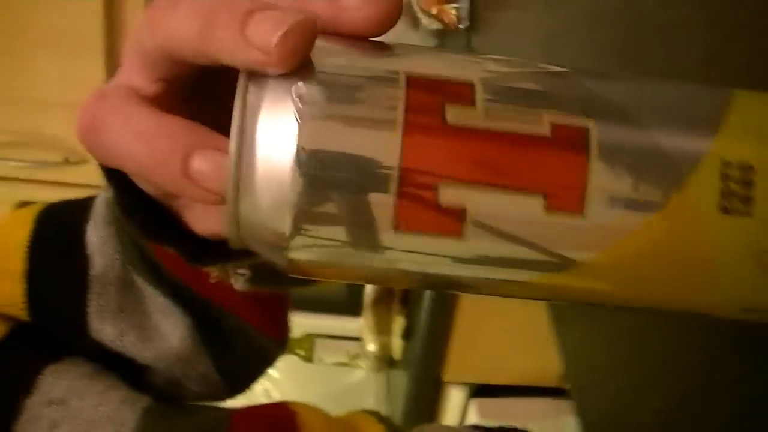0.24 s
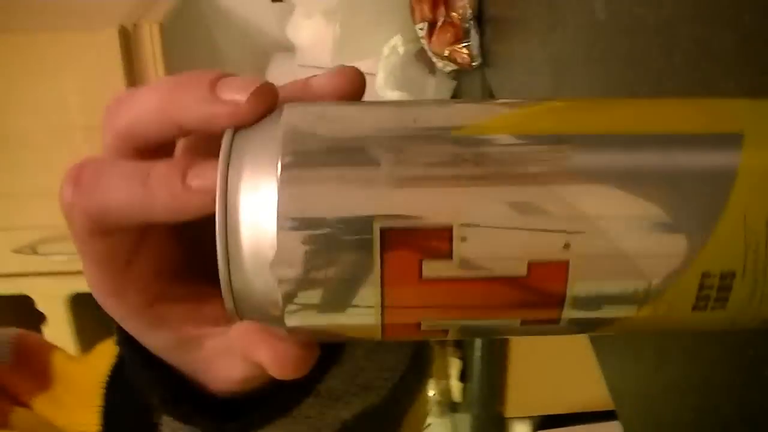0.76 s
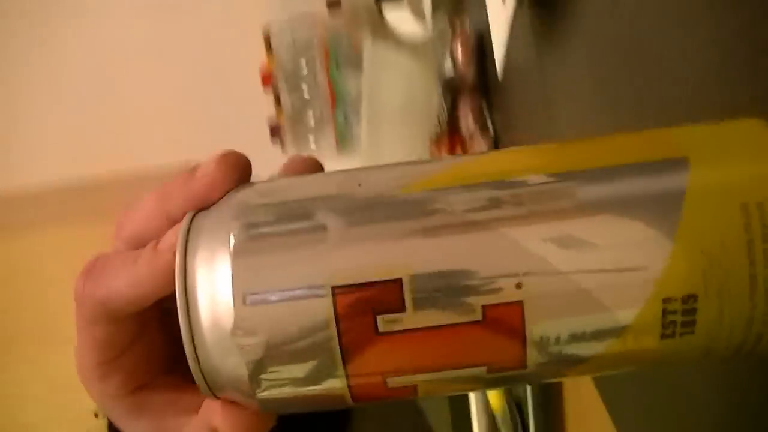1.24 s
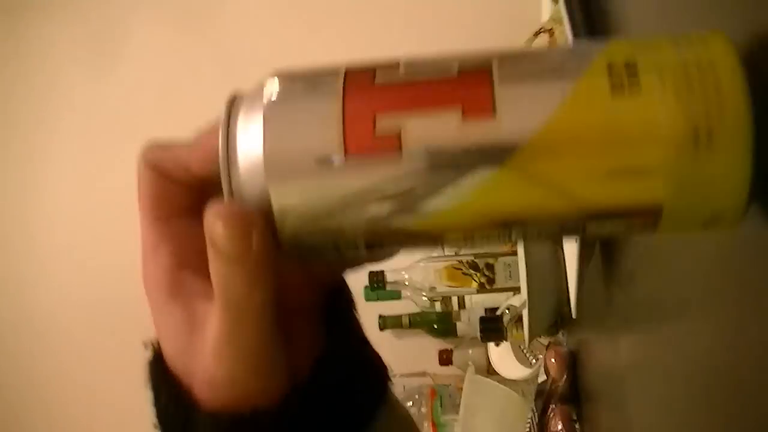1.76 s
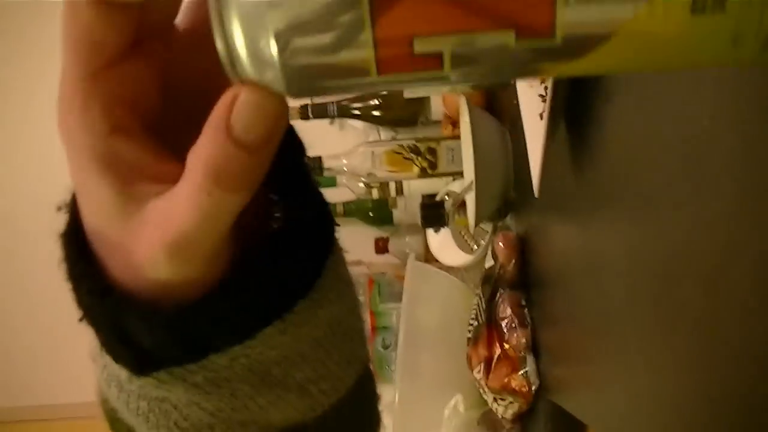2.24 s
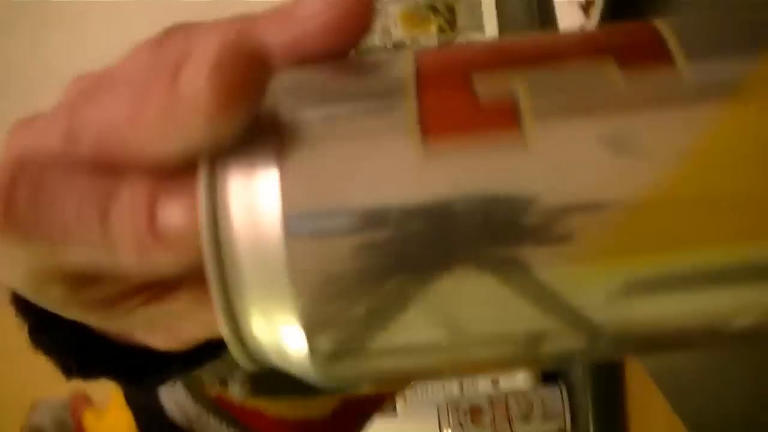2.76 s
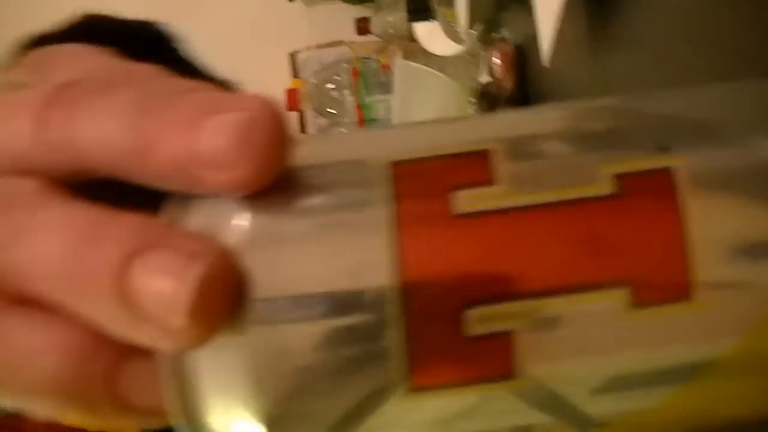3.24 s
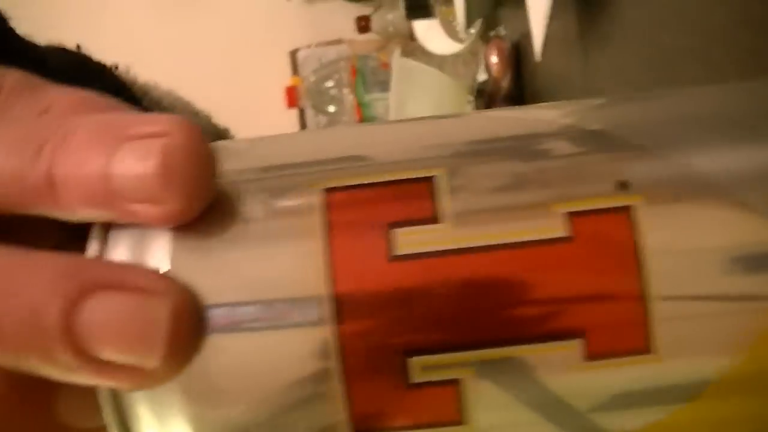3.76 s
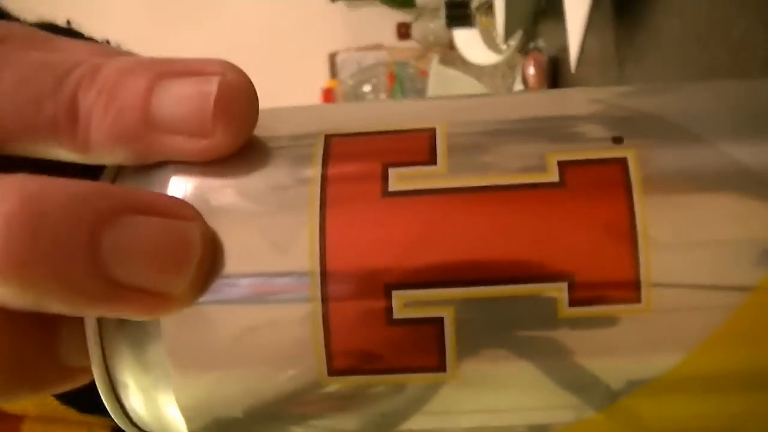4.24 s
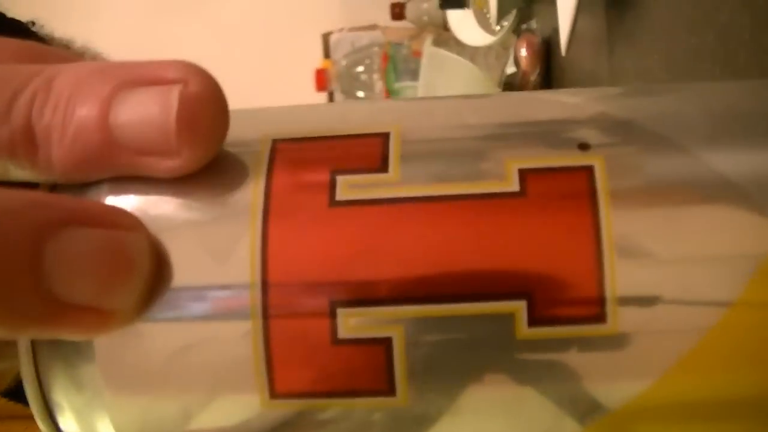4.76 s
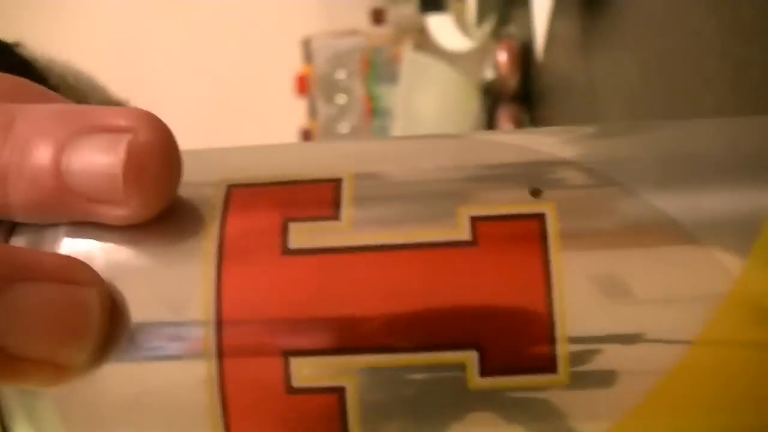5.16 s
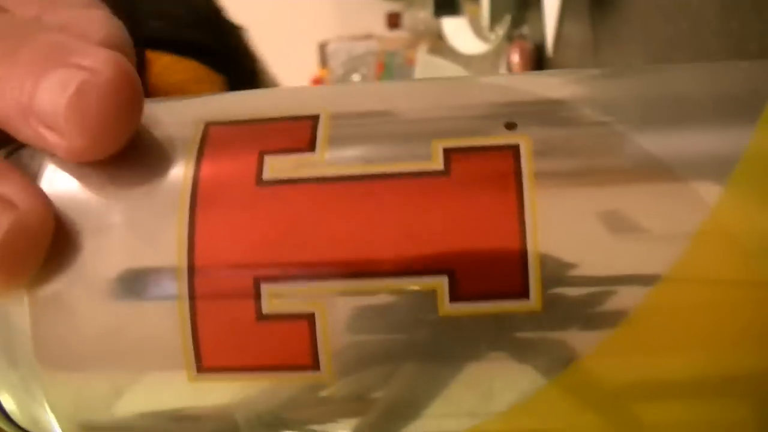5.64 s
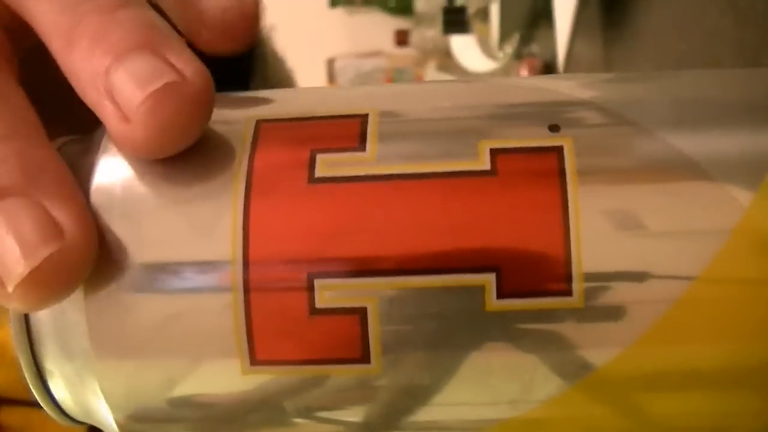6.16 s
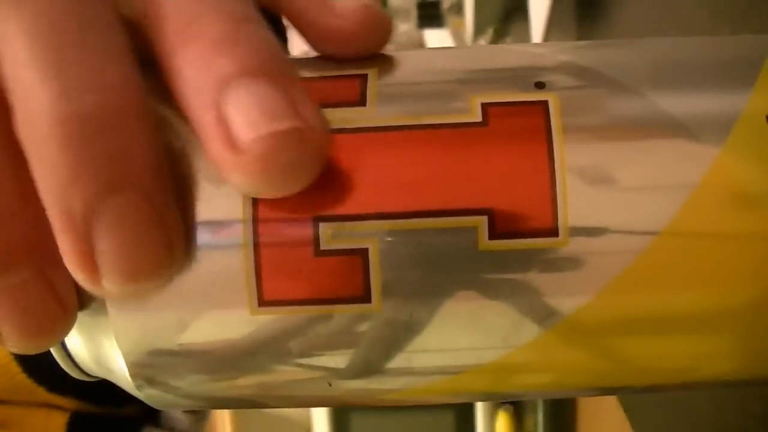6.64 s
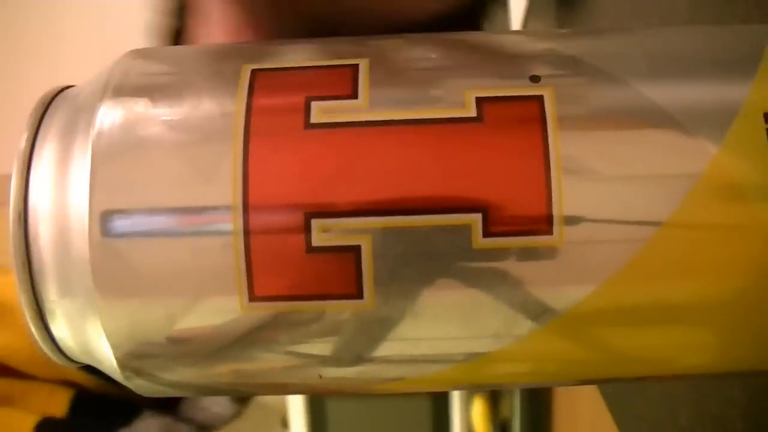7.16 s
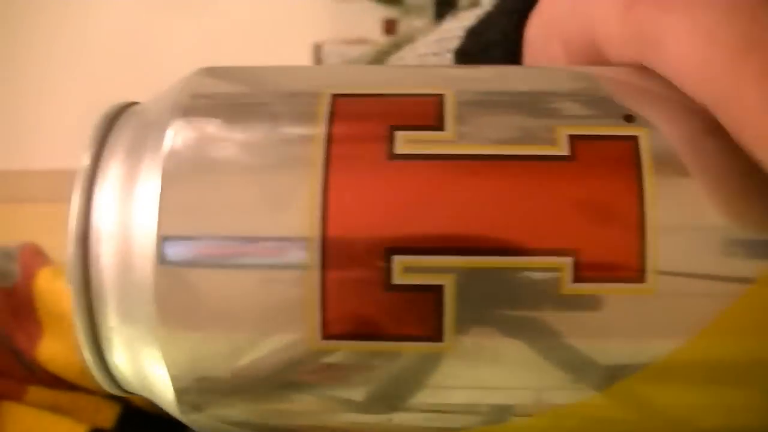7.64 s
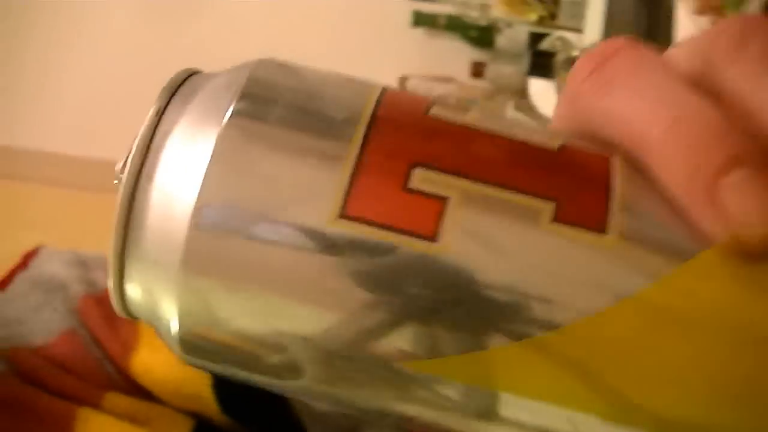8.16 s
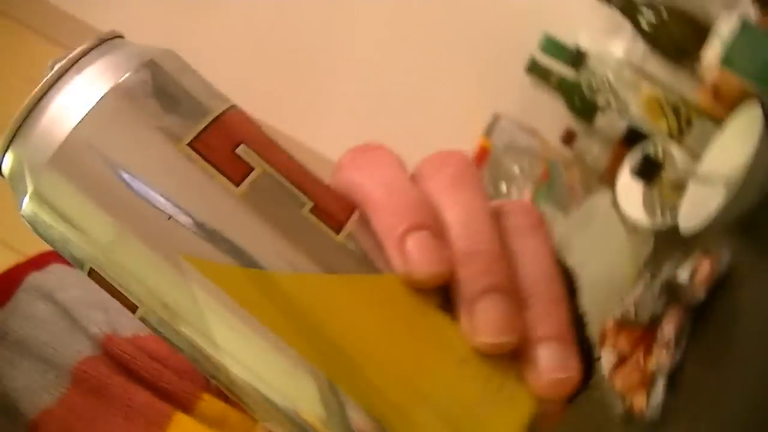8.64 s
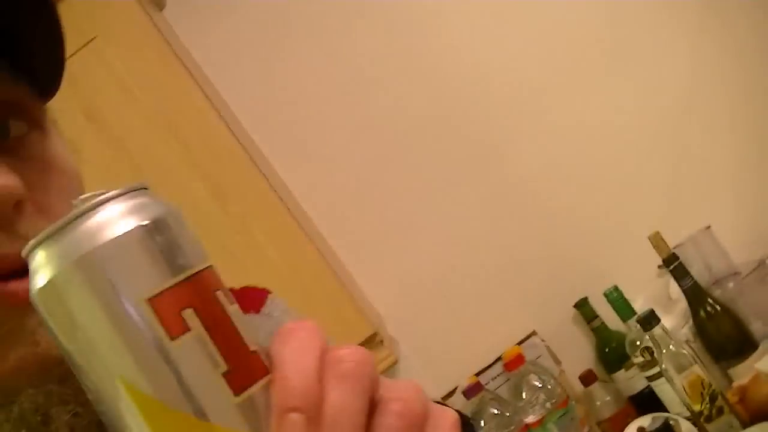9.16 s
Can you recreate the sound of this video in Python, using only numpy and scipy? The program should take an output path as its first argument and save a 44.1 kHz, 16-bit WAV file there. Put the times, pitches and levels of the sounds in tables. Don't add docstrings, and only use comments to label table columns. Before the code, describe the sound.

A small microphone close to a drink can picks up dry scuffs, nail ticks and soft hollow rubbing, with the wall ringing briefly. Things settle, then a violent hissing snap and tearing crack distort the sound as the can opens. A short fizz dies in the hard room; light tab clicks, a small springy rebound and tiny foam pops follow over faint hiss.

```python
import sys
import numpy as np
from scipy import signal
from scipy.fft import rfft, irfft, next_fast_len
from scipy.io import wavfile
from scipy.ndimage import uniform_filter1d

SR = 44100
rng = np.random.default_rng(int(sys.argv[2]) if len(sys.argv) > 2 else 0)


def decibels_to_gain(level_db):
    exponent = np.asarray(level_db, float) / 20
    return 10 ** exponent


def transcribe(u):
    v = np.clip(np.atleast_2d(u).T, -1, 1)
    q = np.round(v * 32767).astype(np.int16)
    wavfile.write(sys.argv[1], SR, q)


N = 414099

SEAL_S, LID_S = 4.8176, 5.0668


def evened(x):
    return x / np.sqrt(np.mean(x ** 2) + 1e-20)


def coloured(x, points):
    size = next_fast_len(len(x))
    point_hz, point_db = np.transpose(points)
    hz = np.fft.rfftfreq(size, 1 / SR)
    gain = decibels_to_gain(np.interp(np.log(hz + 1), np.log(point_hz + 1), point_db))
    return irfft(rfft(x, size) * gain, size)[:len(x)]


def add(mix, start_s, sound):
    part = mix[round(start_s * SR):][:len(sound)]
    part += sound[:len(part)]


def ring(x, hz, t60_s):
    r = np.exp(-np.log(1000) / (max(t60_s, .002) * SR))
    w = 2 * np.pi * hz / SR
    return signal.lfilter([0, np.sin(w)], [1, -2 * r * np.cos(w), r * r], x)


def slips(per_s, spread_db, size=N):
    where, big, sign = rng.random((3, size))
    big = decibels_to_gain(-spread_db * np.log(big + .01))
    return (where < per_s / SR) * big * np.sign(sign - .5)


def swell(t, peak_s, db, rise_s, fall_s):
    rising = (peak_s - t) / np.maximum(rise_s, 1e-4)
    falling = (t - peak_s) / np.maximum(fall_s, 1e-4)
    return decibels_to_gain(db - 20 * np.maximum(rising, falling))


def burst(noise, t60_s, rise_s=0.0005):
    t = np.arange(len(noise)) / SR
    start = np.minimum(t / rise_s, 1) * (t < t[-1] / 2)
    z = rfft(noise * start * decibels_to_gain(-60 * t / max(t60_s, .002)))
    lumps = uniform_filter1d(abs(z), size=len(noise) // 128)
    return irfft(z / lumps) * start


def cracks(rows):
    out, hz = np.zeros(N), np.fft.rfftfreq(8192, 1 / SR)
    for start_s, peak_db, centre_hz, octaves, t60_s, *_ in rows:
        away = np.log2((hz + 20) / centre_hz) / max(octaves, .1)
        colour = 1 / (1 + away ** 4) + 1.3 / (1 + (10.0 * away) ** 2)
        crack = irfft(rfft(burst(rng.standard_normal(8192), t60_s)) * colour)[:4096]
        crack[:16] *= np.arange(16) / 16
        crack[2048:] *= np.hanning(4096)[2048:]
        add(out, start_s, decibels_to_gain(peak_db) * crack / abs(crack).max())
    return out


def tear(start_s, db, t60_s, snaps_per_s, tone):
    t = np.arange(32768) / SR
    out = np.zeros(N)
    snaps = evened(coloured(slips(snaps_per_s, 1.7, size=32768), tone))
    add(out, start_s, snaps * decibels_to_gain(db - 60 * t / t60_s))
    return out


def strokes(rows, rustle_db):
    t = np.arange(0, N, 32) / SR
    peak_s, db, rise_s, fall_s, dry_db = np.transpose(rows)[:, :, None]
    power = swell(t, peak_s, db, rise_s, fall_s) ** 2
    shares = decibels_to_gain([-.6 * dry_db, 0 * dry_db, 1.4 * dry_db + rustle_db]) ** 2
    return [np.interp(np.arange(N) / SR, t, np.sqrt(line)) for line in (shares * power).sum(axis=1)]


def can_wall(knocks, rubbing, modes, split_hz=800):
    # hz, db_per_hz
    skin_tone = [(88, -48.5), (150, -24), (275, -10), (309, 3.5), (534, 1.5), (700, 2.5), (1060, 2.5),
                 (7770, -31), (16000, -45.5)]
    damping_db = 2.8
    deep, upper, rustle = rubbing
    start_s, peak_db, centre_hz, octaves, _, ring_db = np.transpose(knocks)
    spot = rng.standard_normal((len(start_s), len(modes)))
    drive, struck, low, high = slips(1500, 2.6), 0, 0, 0
    knots = np.arange(0, N + 3000, 3000)
    for (hz, db, t60_s), chance in zip(modes, spot.T):
        near_db = -4.0 * abs(np.log2(hz / centre_hz)) / np.maximum(octaves, .2)
        blows = np.zeros(N)
        blows[np.round(start_s * SR).astype(int)] = decibels_to_gain(peak_db + ring_db + db + near_db + 1.9 * chance)
        struck = struck + ring(blows, hz, t60_s)
        free = np.interp(np.arange(N), knots, rng.standard_normal(len(knots)))
        hum = decibels_to_gain(db + damping_db * free) * evened(ring(drive, hz, .5 * t60_s))
        if hz < split_hz:
            low = low + hum
        else:
            high = high + hum
    skin = evened(coloured(slips(4000, 0.83), skin_tone))
    bright = evened(coloured(skin, [(2500, -28.5), (4500, 1.0), (16000, 0)]))
    rubbed = deep * evened(low) + upper * (.6 * evened(high) + 0.55 * skin) + 0.51 * rustle * bright
    return cracks(knocks) + struck + rubbed


def air():
    # hz, db_per_hz
    air_tone = [(25, -24), (60, -21), (120, -12), (250, -8), (500, -6.5), (800, -6), (1200, -2.5),
                (1600, -4.5), (2200, -10.5), (4000, -16.5), (8000, -20), (13000, -26.5), (16200, -32)]
    waver = decibels_to_gain(.8 * evened(uniform_filter1d(rng.standard_normal(N), 6000)))
    return decibels_to_gain(-62.5) * evened(waver * coloured(rng.standard_normal(N), air_tone))


def sealed_can():
    # start_s, peak_db, centre_hz, ring_db
    tick_rows = [
        (0.0745, -35, 3520, -33),
        (1.053, -42, 2020, -24),
        (1.95, -22.5, 1950, -14.5),
        (2.578, -12.5, 1940, -21),
    ]
    # start_s, peak_db, centre_hz, t60_s, ring_db
    nail_rows = [
        (0.6666, -14.5, 4680, 0.031, -11.5),
        (0.6665, -26, 2420, 0.016, -12),
        (1.1673, -32, 2090, 0.029, -7),
        (2.6412, -27.5, 4800, 0.031, -20),
    ]
    # start_s, peak_db, octaves, t60_s, ring_db
    thud_rows = [(0.302, -63, 1.3, 0.035, 4), (0.919, -40, 1.1, 0.047, -8.5),
                 (1.9497, -29, 1.7, 0.011, -10.5), (2.517, -49, 1.4, 0.03, -14), (2.571, -38, 2, 0.03, -9),
                 (2.576, -28, 2.3, 0.048, -8), (2.807, -45.5, 2.3, 0.03, -2), (3.039, -39, 1.9, 0.093, -7)]
    # hz, db, t60_s
    sealed_modes = [(281, 5.5, 0.29), (354, -4, 0.11), (420, -12.5, 0.13), (1122, -3.5, 0.18),
                    (1133.3, -8.5, 0.17), (1751, -8, 0.23), (1950, -5, 0.16), (2360, -5, 0.13),
                    (2400, -11.5, .12), (2630, -9.5, 0.177), (3310, -14, 0.15), (4390, -13, 0.12),
                    (4800, -14, 0.15), (5052, -16, .15), (6300, -17, 0.11)]
    # (rise, fall per
    # 20 dB)
    handling = [(.074, -63, .012, .03, 11), (.13, -62, 0.066, .15, 3), (.21, -62, .05, .2, -2),
                (.302, -50, 0.18, 0.11, -4.5), (.364, -49, 0.044, 0.14, 6.5), (.69, -48, .008, 0.073, -3),
                (.782, -49.5, 0.13, 0.12, -2), (.935, -48.5, 0.097, 0.09, 0), (1.058, -49.5, .05, 0.16, 3.5),
                (1.15, -56, 0.12, 0.057, -12), (1.19, -53.5, .02, .15, 6), (1.266, -46, 0.095, 0.072, -0.5),
                (1.382, -52, .12, 0.13, 2.5), (1.47, -54, .08, 0.057, -10), (1.52, -58.5, 0.022, 0.18, -7),
                (1.62, -61.5, 0.091, 0.47, 12.5), (1.802, -52, 0.14, 0.22, 7.5),
                (1.93, -57.5, 0.037, 0.035, 4),
                (1.979, -40, 0.025, 0.12, -0.5), (2.08, -51, .1, 0.5, 2), (2.14, -56, .05, .06, 8),
                 (2.32, -53.5, .03, 0.15, 7), (2.43, -63, 0.14, 0.031, -15), (2.518, -65, .03, .03, 0),
                 (2.556, -54.5, .04, 0.022, 0), (2.6, -36, 0.016, 0.088, 1.5),
                 (2.646, -41, .04, 0.029, 8.5), (2.67, -46, .03, 0.13, 3), (2.824, -47.5, 0.049, 0.2, 4.5),
                 (3.05, -50, 0.035, 0.061, -9), (3.184, -56, 0.092, 0.11, -11.5),
                 (3.271, -61.5, .05, .2, -9), (3.344, -59.5, .15, 0.27, 1), (3.466, -59.5, 0.24, 0.051, -4),
                 (3.57, -72.5, .05, .5, -13), (3.704, -72, .1, .08, -2), (4.0, -72.5, .5, 0.66, -2),
                 (4.504, -55.5, 0.092, 0.048, 2), (4.6, -62.5, .08, 0.046, 2), (4.79, -63, 0.064, .02, -5)]
    ticks = [(s, db, hz, 1, 0.029, ring_db) for s, db, hz, ring_db in tick_rows]
    nail = [(s, db, hz, 0.26, t60_s, ring_db) for s, db, hz, t60_s, ring_db in nail_rows]
    thuds = [(s, db, 287, *rest) for s, db, *rest in thud_rows]
    return can_wall(ticks + nail + thuds, strokes(handling, rustle_db=-12), sealed_modes)


def knock_edges():
    # start_s, peak_db, centre_hz, octaves, t60_s
    edge_rows = [(0.0742, -33, 6400, 0.57, 0.016), (0.6669, -11.5, 5840, 1, 0.015),
                 (1.1662, -31, 6000, 0.9, 0.02), (1.951, -30, 7000, 0.74, 0.037),
                 (2.5757, -13.5, 8400, 0.98, 0.012), (2.578, -23, 6500, .55, .03),
                 (2.6399, -26.5, 4300, 1.4, 0.018), (6.4595, -26, 5190, 0.55, 0.03),
                 (6.46, -26, 2200, .5, .05), (6.9935, -46.5, 5590, 0.3, 0.019)]
    return cracks(edge_rows)


def lone_modes():
    # start_s, hz, height_db, t60_s
    lingering = [(.671, 280, -41, .12), (2.82, 1750, -55, .4), (5.076, 183, -46, 1.1),
                 (5.077, 285, -47, 1.5), (5.078, 318, -53, 1.0), (5.079, 361, -51, 1.2),
                 (6.335, 425, -58, .5), (6.461, 2690, -53, .7), (6.975, 178, -54, 1.0),
                 (6.99, 447, -53, 1.8)]
    ping_rows = [(.0745, 2000, -48.5, .06), (0.0742, 3550, -45, .05), (.45, 6120, -58, .07),
                 (.669, 1954, -35, 0.089), (.668, 5040, -32, .2), (.668, 4560, -25, .07),
                 (1.9415, 1900, -45, 0.033), (1.951, 9200, -39.5, .02), (1.951, 12800, -40, .01),
                 (2.577, 8900, -28, .018), (2.577, 5960, -32, .02), (2.578, 4490, -34, .025),
                 (2.825, 2400, -56, .3), (3.04, 3290, -56, .15), (5.067, 4200, -2.5, .013),
                 (5.07, 1850, -9, .035), (5.075, 2294, -30.5, 0.41), (5.075, 1880, -31, 0.36),
                 (5.074, 820, -13, .055), (6.456, 1110, -45, .03), (6.4598, 2643, -16, .022),
                 (6.4598, 5190, -30, .015), (6.46, 10200, -35, .006), (6.9745, 946, -41, .04),
                 (6.9755, 4800, -50, .03), (6.9935, 1054, -37, .035), (6.9932, 4900, -46, .04),
                 (6.9935, 6300, -47, .03), (7.04, 440, -56, 1.4)]
    out, t = np.zeros(N), np.arange(SR) / SR
    for start_s, hz, db, t60_s in lingering + ping_rows:
        wobble = 1 + .006 * evened(uniform_filter1d(rng.standard_normal(SR), 1500))
        tone = np.sin(2 * np.pi * hz * np.cumsum(wobble) / SR)
        envelope = np.minimum(t * hz / 2, 1) * decibels_to_gain(db - 60 * t / t60_s) * (1 - t)
        add(out, start_s, envelope * tone)
    return out


def kitchen(x):
    # hz, t60_s
    decay = [(150, 0.54), (400, 1), (1000, .7), (2500, 0.74), (5000, 0.55), (9000, 0.57), (15000, 0.15)]
    echoes, at = np.zeros(SR), np.arange(260, SR - 20, 12)
    echoes[at + rng.integers(0, 12, len(at))] = rng.choice([-1., 1.], len(at))
    hz, t, z = signal.stft(echoes, SR, nperseg=256)
    decay_hz, t60_s = np.transpose(decay)
    band_t60_s = np.interp(np.log(hz + 1), np.log(decay_hz), t60_s)[:, None]
    tail = signal.istft(z * decibels_to_gain(-60 * t / band_t60_s), SR, nperseg=256)[1]
    return signal.fftconvolve(x, tail / np.linalg.norm(tail))[:N]


def thumps():
    # start_s, peak_db, centre_hz, octaves, t60_s
    thump_rows = [(0.14, -50, 180, 0.8, 0.15), (0.74, -52, 150, 0.8, 0.07), (1.496, -57, 150, 0.41, 0.12),
                  (1.95, -56, 150, .8, 0.1), (1.1, -68, 130, .6, .08), (2.575, -58, 130, .6, .12),
                  (3.04, -64, 130, .6, .1), (6.975, -59, 130, .6, .12)]
    return cracks(thump_rows)


def close_clicks():
    # start_s, peak_db, centre_hz, octaves, t60_s
    low_rows = [(0.141, -28, 800, 1.6, 0.03), (0.147, -26.5, 714, 1.9, 0.058),
                (.165, -33.5, 1400, 0.98, .06), (.178, -37, 1700, .6, .03), (1.496, -25, 960, 1.3, 0.026),
                (9.078, -40, 630, 0.78, 0.058), (9.29, -45, 1300, 0.4, 0.027)]
    high_rows = [(0.1515, -25.5, 2570, 1.3, 0.0075), (0.1619, -24, 6590, 1.4, 0.0085),
                 (0.1792, -36, 5500, 0.6, 0.0074), (1.4814, -39, 1860, 1.4, 0.05),
                 (1.495, -25, 2220, 1.35, 0.02), (1.5135, -52, 2290, 1.3, 0.01),
                 (1.807, -38, 6000, 1.4, 0.011), (5.4637, -28.5, 3210, 1.23, 0.01),
                 (5.6745, -30, 2420, 1.3, 0.016), (6.78, -25, 2100, .9, 0.0091)]
    bright_rows = [(1.4983, -56, 8030, 0.92, 0.008), (5.4655, -38, 8200, 0.46, 0.0038),
                   (5.6745, -35.5, 9020, 0.9, 0.0098), (6.78, -31.5, 6500, 1, 0.01)]
    # start_s, peak_db, centre_hz
    fizz_rows = [(5.055, -31, 8000), (5.3774, -53, 8720), (5.385, -54, 8600), (5.9804, -51, 9460),
                 (6.0634, -51, 6320), (6.1345, -47.5, 8720), (8.5579, -50.5, 6370), (8.7135, -30.5, 12220),
                 (8.752, -51, 7640), (8.8845, -37, 8100), (8.9034, -46.5, 5080), (8.9145, -45.5, 7500),
                 (8.9478, -49, 7900), (8.877, -47, 7000)]
    fizz = [(*row, 0.71, 0.01) for row in fizz_rows]
    return cracks(high_rows + low_rows + bright_rows + fizz)


def vent():
    # hz, db_per_hz
    jet_tone = [(180, -54), (300, -22.5), (487, -23), (727, -31.5), (965, -18.5), (1370, -22), (1820, -4),
                (2420, -11), (2630, -8), (3610, -3), (5290, -6), (7770, 1), (9030, -9.5), (11600, -4.5),
                (16200, -19.5)]
    # hz, db_per_hz
    gush_tone = [(59, -53.5), (100, -19), (458, -3.5), (989, -6), (1090, -16.5), (1310, -1), (1540, -14),
                 (3660, -6.5), (5000, -8), (6500, -38), (11000, -120)]
    # peak_s, db, rise_s, fall_s
    gush_rows = [
        (4.819, -34.5, 0.0019, .08),
        (4.92, -27.5, .045, 0.16),
    ]
    leak_s, blow_db, blow_s, shut_s = 0.0076, -16, 0.055, .024
    t = np.arange(N) / SR
    down_s = SEAL_S + blow_s
    venting = (t > SEAL_S) & (t < LID_S)
    leak = decibels_to_gain(-36) * (t < SEAL_S) * np.clip((t - SEAL_S + leak_s) / .004, 0, 1)
    spurt = swell(t, SEAL_S, -7, 1, fall_s=0.022)
    blow = np.where(t < down_s, decibels_to_gain(blow_db), swell(t, down_s, blow_db, 1, shut_s))
    trickle = swell(t, down_s + shut_s, -31.5, shut_s, fall_s=0.13)
    seep = decibels_to_gain(-47.5)
    jet = leak + venting * (spurt + blow + trickle + seep)
    gush = venting * sum(swell(t, *row) for row in gush_rows)
    sputter = decibels_to_gain(1.3 * evened(uniform_filter1d(rng.standard_normal(N), 60)))
    hiss = evened(sputter * coloured(rng.standard_normal(N), jet_tone))
    return jet * hiss + gush * evened(coloured(slips(2500, 2.4), gush_tone))


def seal_break():
    # hz, db_per_hz
    seal_tone = [(18, -60.5), (30, -28), (267, -32.5), (895, -19), (1160, -27.5), (1970, -4.5),
                 (2850, -4.5), (3090, -17), (3430, -7.5), (6280, 2), (7550, -1.5), (14200, -16.5),
                 (16200, -29.5)]
    return tear(SEAL_S, db=-1.1, t60_s=0.04, snaps_per_s=6000, tone=seal_tone)


def opened_can():
    # start_s, peak_db, centre_hz, t60_s, ring_db
    grip_rows = [
        (8, -49.5, 376, 0.069, -47),
        (6.974, -34.5, 982, 0.054, -16),
        (7.003, -39.5, 480, 0.17, -20),
        (4.892, -36, 350, .04, -30),
        (7.743, -32.5, 505, 0.053, -31),
        (4.912, -27, 600, .06, -20),
    ]
    # start_s, peak_db, centre_hz, octaves, ring_db
    jolt_rows = [
        (5.076, -36, 260, 0.64, -1),
        (6.977, -45, 600, 0.73, -4),
    ]
    # start_s, peak_db, centre_hz, octaves, ring_db
    tab_rows = [
        (6.459, -26, 2120, 0.83, -14.5),
        (6.4599, -25, 2720, 0.22, -15),
        (6.9762, -36.5, 2520, 0.25, -29.5),
        (6.9825, -35, 2300, 0.53, -30),
        (6.9937, -39, 3000, 0.6, -30),
    ]
    # hz, db, t60_s
    opened_modes = [(175, -8, 0.4), (250, -9, .4), (282, -6, .6), (450.9, -8.5, 0.4), (495, -8.5, 0.13),
                    (686, -10, 0.22), (988, 0, 0.2), (1300, -9, .12), (2200, -9.5, 0.13),
                    (2400, -8.5, 0.13), (2480, -9.5, .16), (2770, -11.5, 0.2), (3650, -14.5, .15),
                    (5217, -17, .07)]
    # (rise, fall per 20 dB)
    lifting = [(5.5, -58, .012, .3, 5), (5.66, -60, 0.051, .02, 3), (5.7, -55, .012, .14, 8),
               (6.086, -66, 0.31, .06, -1), (6.176, -65, .1, 0.085, -1), (6.35, -54, .04, .08, -2),
               (6.37, -55, .07, 0.038, 2), (6.49, -55, .02, .15, 4), (6.44, -56, .1, .02, 1),
               (7.0, -43, 0.013, 0.043, -0.5), (7.03, -61, .03, 0.27, -14), (7.35, -55.5, 0.075, .1, -5),
               (7.626, -57.5, .09, 0.12, 0), (7.76, -54.5, .04, 0.058, -5), (7.848, -70, 0.078, 0.087, -12)]
    grip = [(s, db, hz, 1.17, t60_s, ring_db) for s, db, hz, t60_s, ring_db in grip_rows]
    blows = [(*rest, 0.028, ring_db) for *rest, ring_db in tab_rows + jolt_rows]
    return can_wall(blows + grip, strokes(lifting, rustle_db=-19), opened_modes)


def lid_rip():
    # start_s, peak_db, centre_hz, octaves, t60_s
    rip_rows = [
        (5.0692, 0.5, 4150, .36, 0.045),
        (5.073, -9, 5800, .4, .04),
        (5.0667, -5, 11440, 0.55, 0.05),
        (5.0685, -1.5, 6300, 0.64, 0.044),
        (5.0690, -1.5, 1920, 0.67, 0.037),
        (5.0718, -8.5, 838, 0.44, 0.057),
    ]
    return cracks(rip_rows)


def last_puff():
    # hz, db_per_hz
    puff_tone = [(200, -39), (600, -15.5), (880, -2.5), (1300, -9.5), (1950, -3.5), (2900, -15), (4000, -2),
                 (5500, -11), (8000, -23.5), (16000, -40)]
    return tear(LID_S, db=-24, t60_s=0.64, snaps_per_s=13000, tone=puff_tone)


def scene():
    # hz, db
    side_tone = [(100, -48), (1000, -54), (4000, -66), (8000, -28), (14000, -25)]
    can = sealed_can() + opened_can() + knock_edges() + lone_modes()
    can += vent() + seal_break() + lid_rip()
    close = close_clicks() + last_puff()
    near = can + close + kitchen(decibels_to_gain(-12.5) * can + decibels_to_gain(-17) * close)
    near = signal.sosfilt(signal.butter(3, 240, "high", fs=SR, output="sos"), near)
    mid = near + thumps() + air()
    side = coloured(mid * np.sign(rng.standard_normal(N)), side_tone)
    return np.array([mid + side, mid - side])


def top_cut(x):
    return signal.sosfilt(signal.butter(12, 16640, fs=SR, output="sos"), x)


def record(dry):
    top, edge_hz = .8, 15750
    held = dry / (1 + abs(dry / top) ** 6) ** (1 / 6)
    lowpass = signal.firwin(767, edge_hz, window=("kaiser", 9), fs=SR)
    held = signal.oaconvolve(held, lowpass[None], "same")
    held = signal.sosfilt(signal.butter(1, 90, "high", fs=SR, output="sos"), held)
    return top_cut(held)


dry = scene()
out = record(dry)
transcribe(out)
```